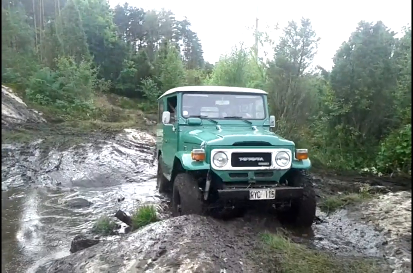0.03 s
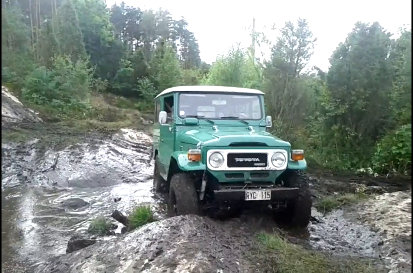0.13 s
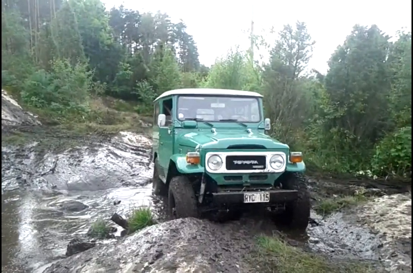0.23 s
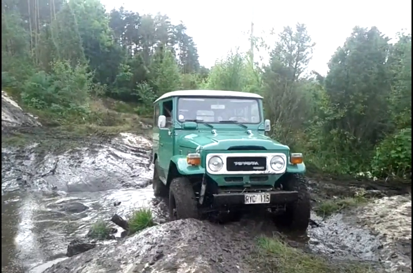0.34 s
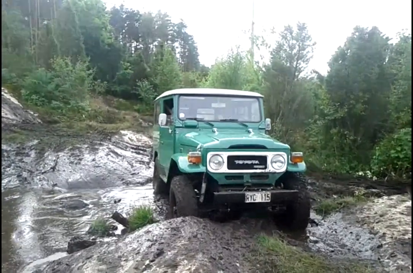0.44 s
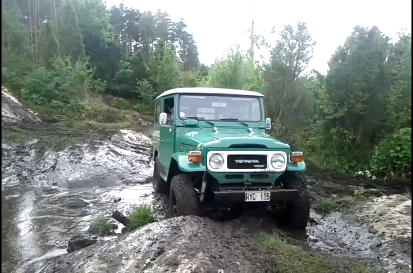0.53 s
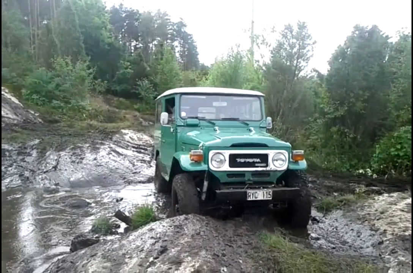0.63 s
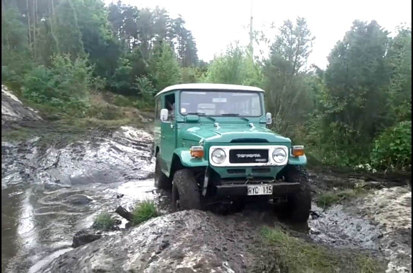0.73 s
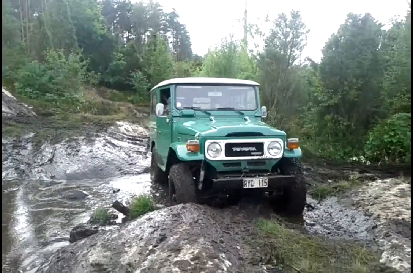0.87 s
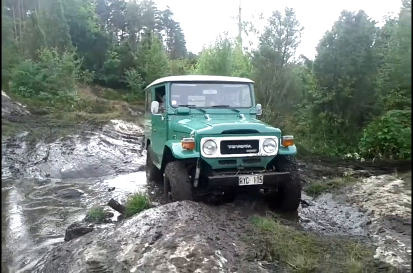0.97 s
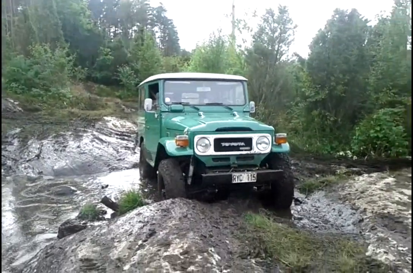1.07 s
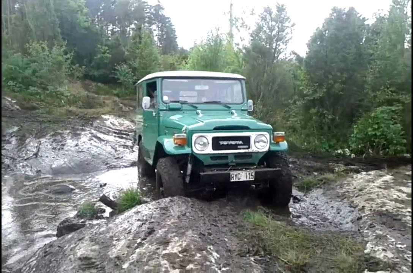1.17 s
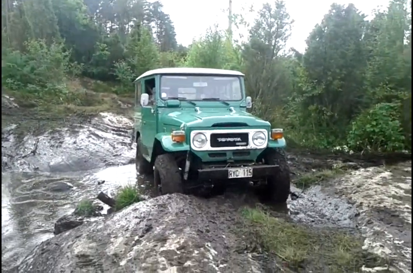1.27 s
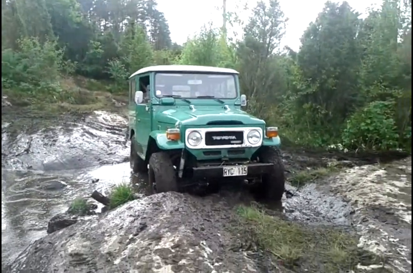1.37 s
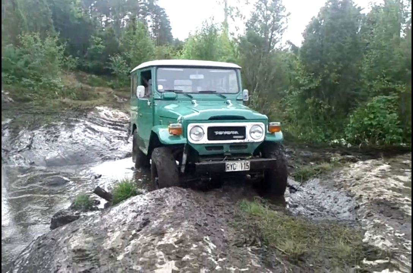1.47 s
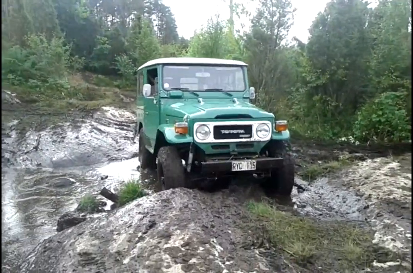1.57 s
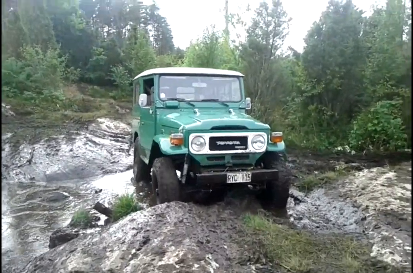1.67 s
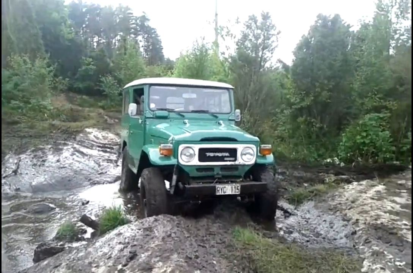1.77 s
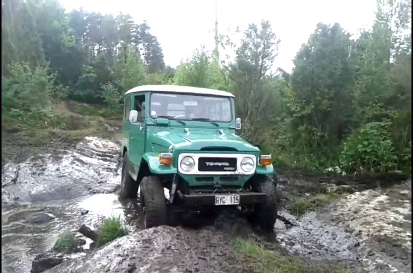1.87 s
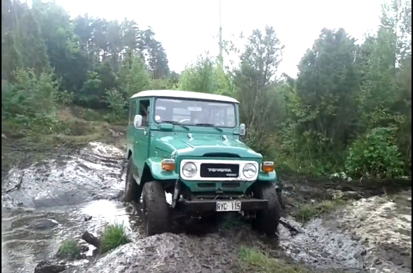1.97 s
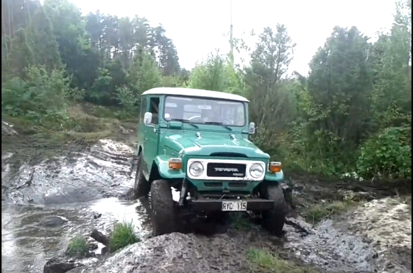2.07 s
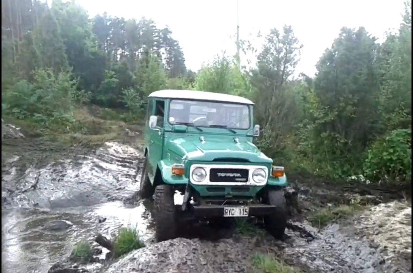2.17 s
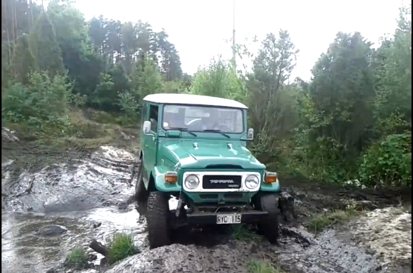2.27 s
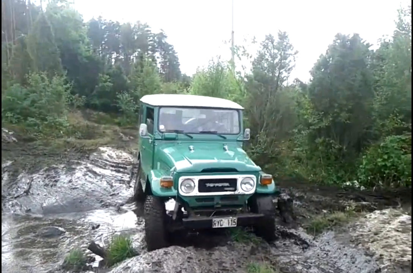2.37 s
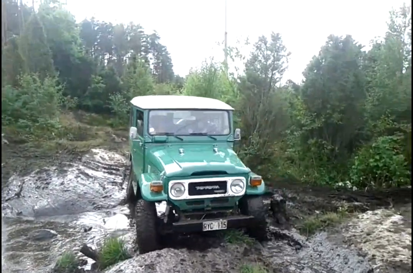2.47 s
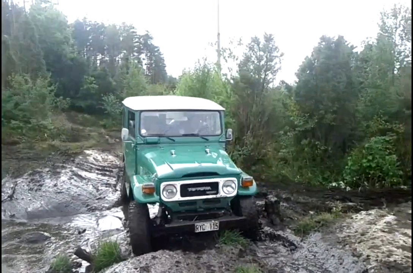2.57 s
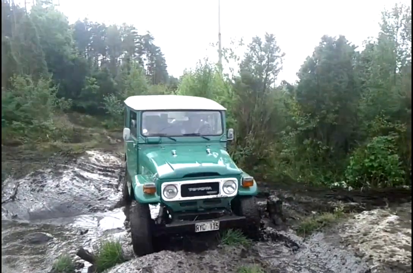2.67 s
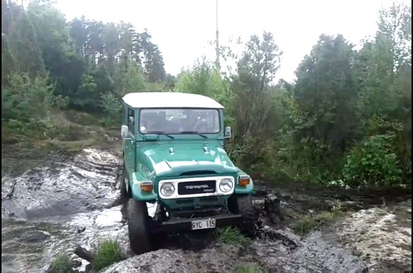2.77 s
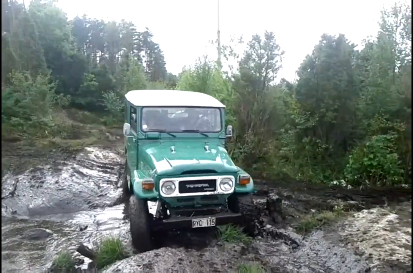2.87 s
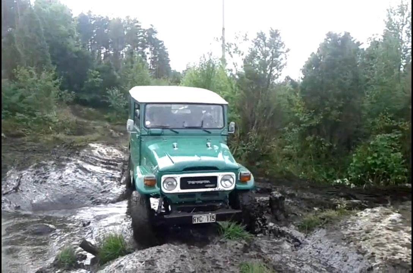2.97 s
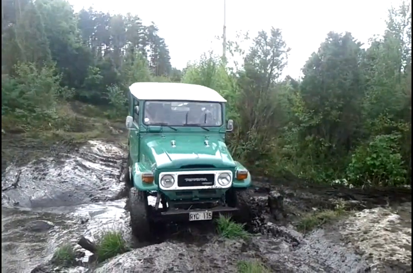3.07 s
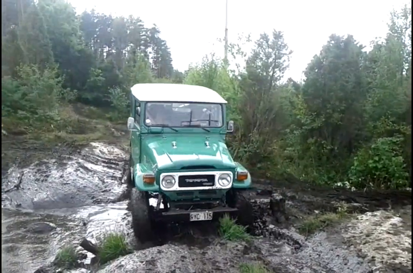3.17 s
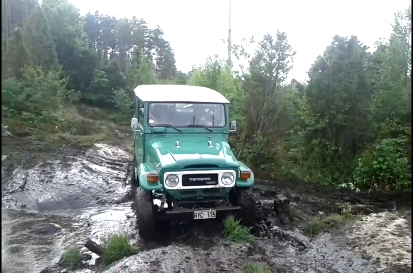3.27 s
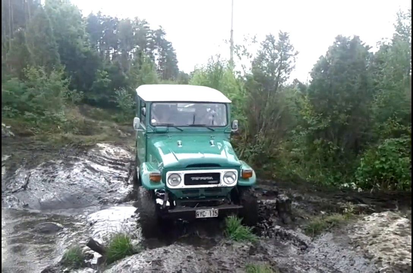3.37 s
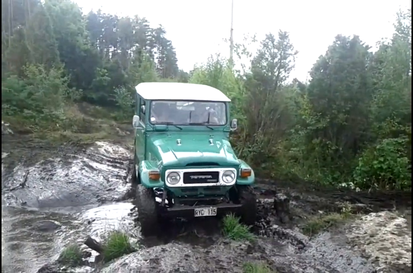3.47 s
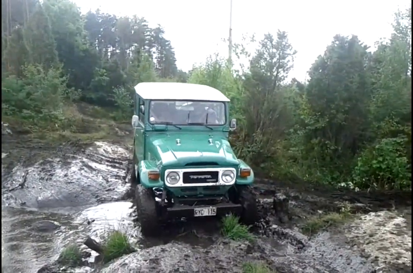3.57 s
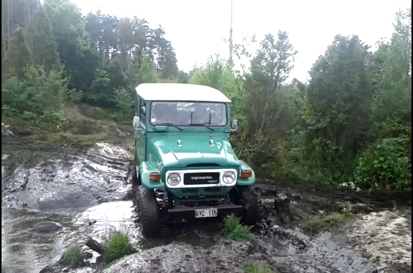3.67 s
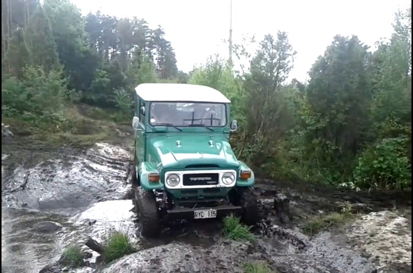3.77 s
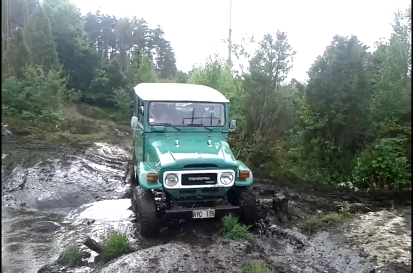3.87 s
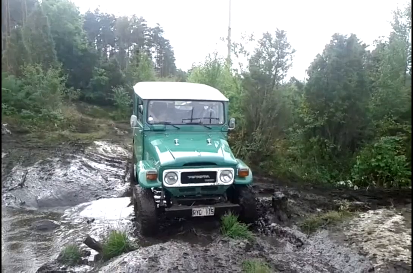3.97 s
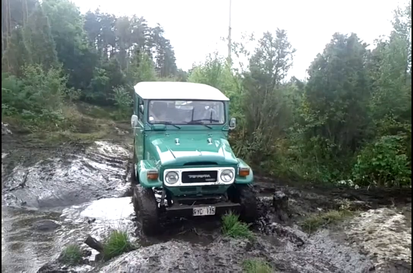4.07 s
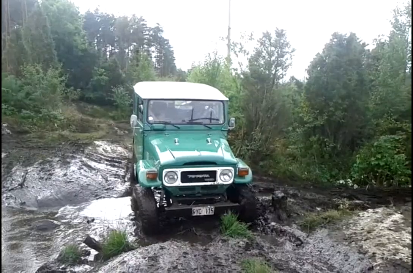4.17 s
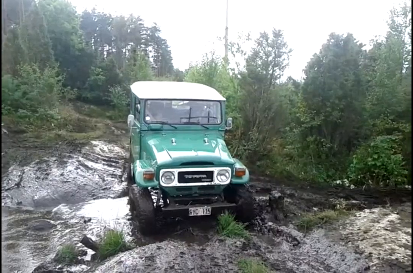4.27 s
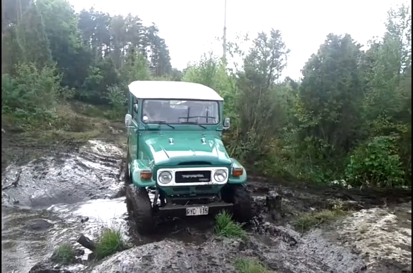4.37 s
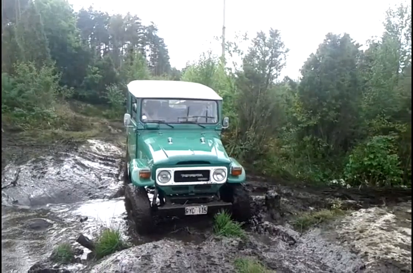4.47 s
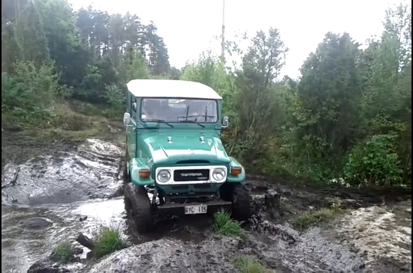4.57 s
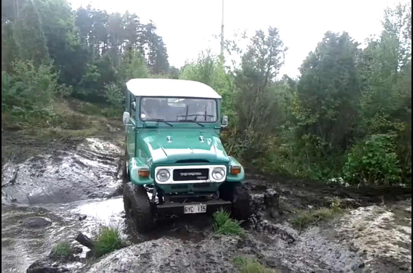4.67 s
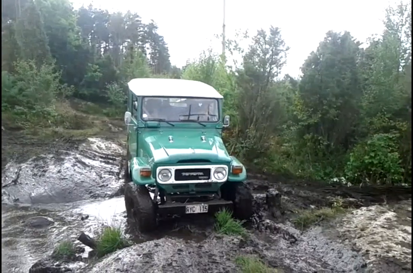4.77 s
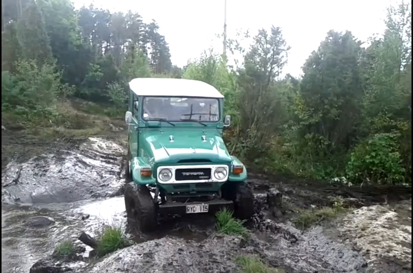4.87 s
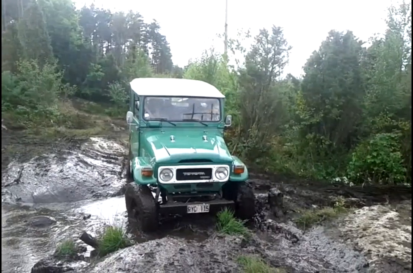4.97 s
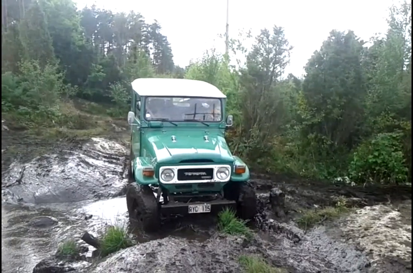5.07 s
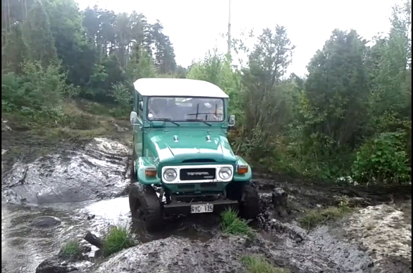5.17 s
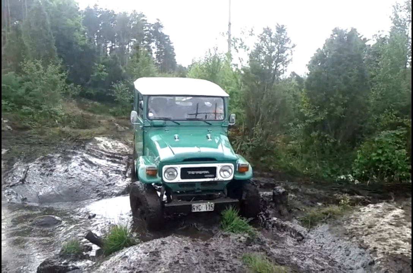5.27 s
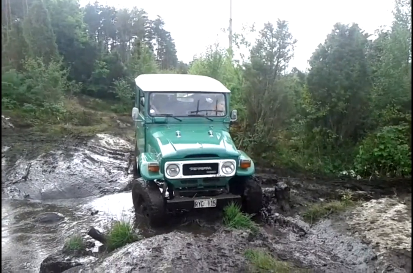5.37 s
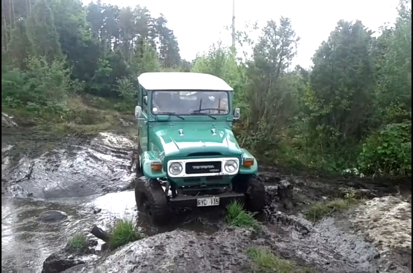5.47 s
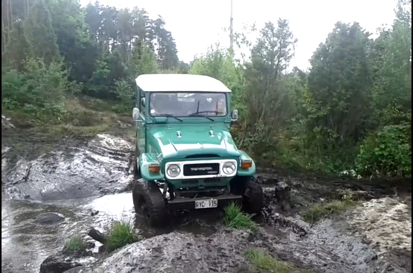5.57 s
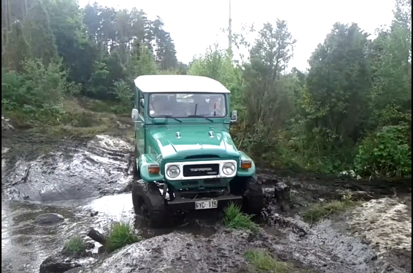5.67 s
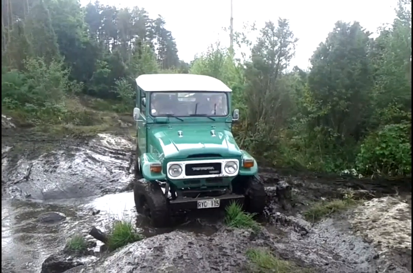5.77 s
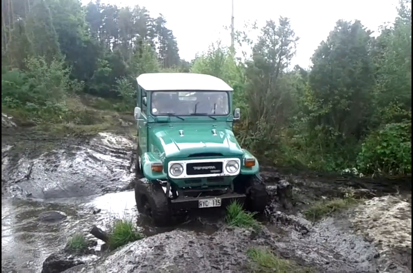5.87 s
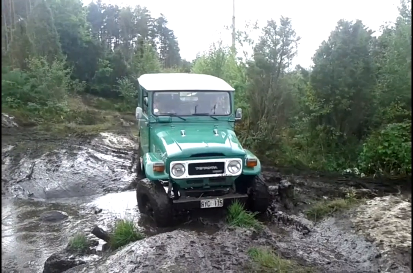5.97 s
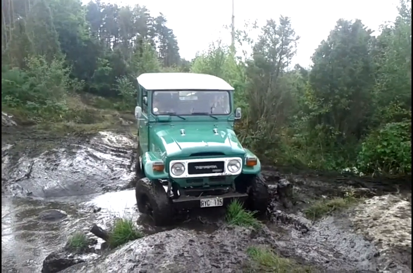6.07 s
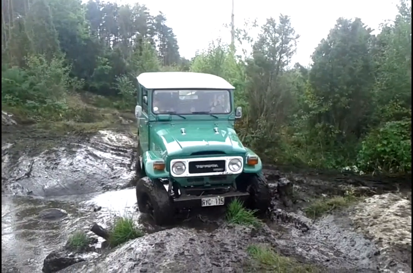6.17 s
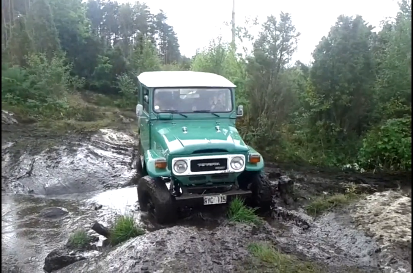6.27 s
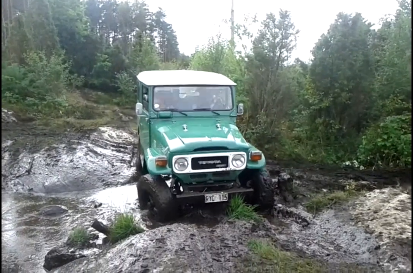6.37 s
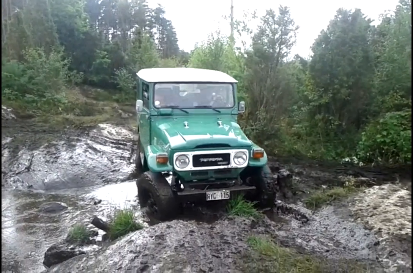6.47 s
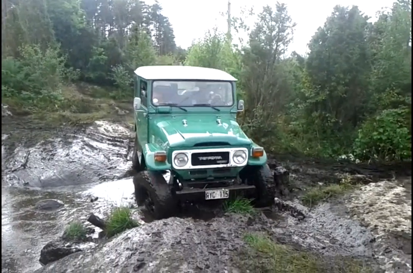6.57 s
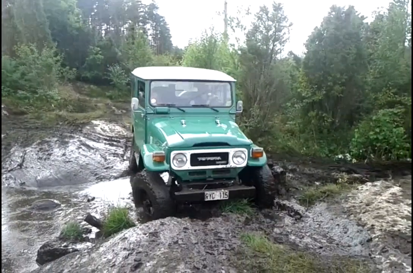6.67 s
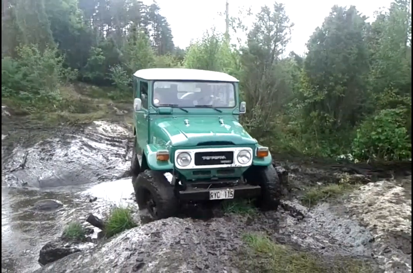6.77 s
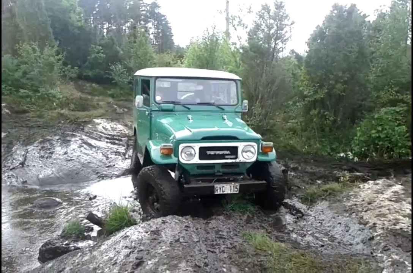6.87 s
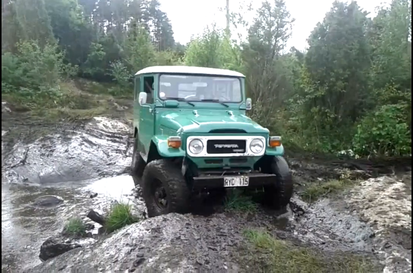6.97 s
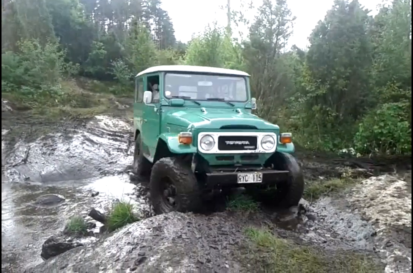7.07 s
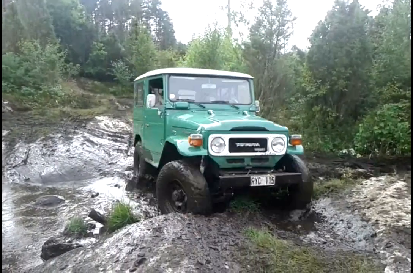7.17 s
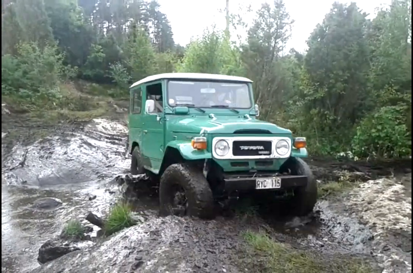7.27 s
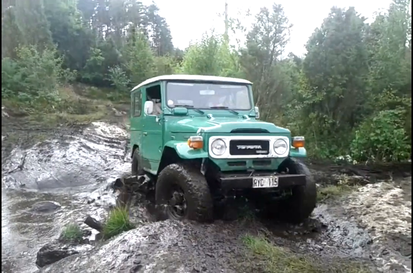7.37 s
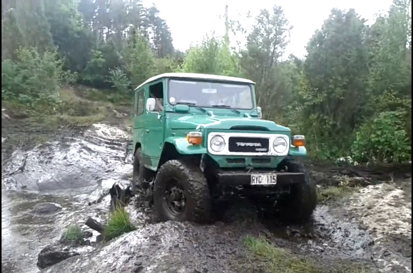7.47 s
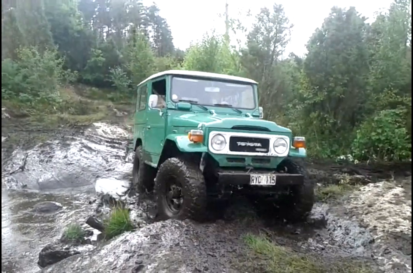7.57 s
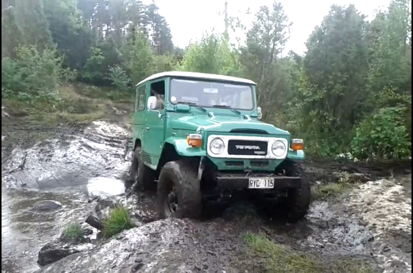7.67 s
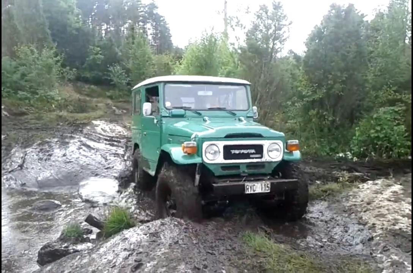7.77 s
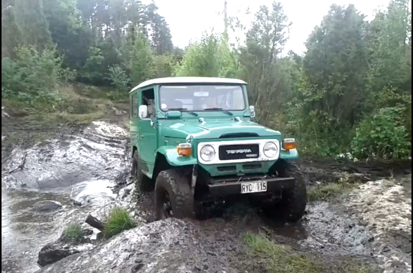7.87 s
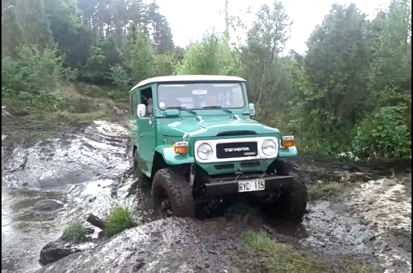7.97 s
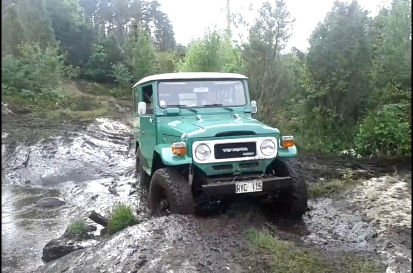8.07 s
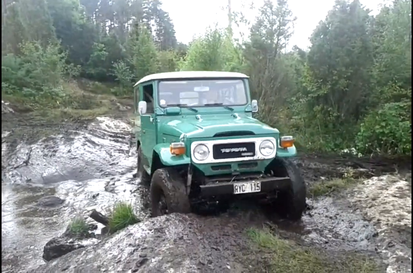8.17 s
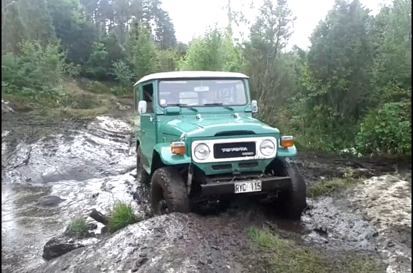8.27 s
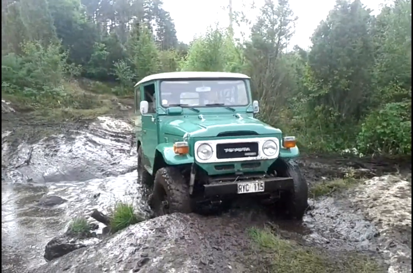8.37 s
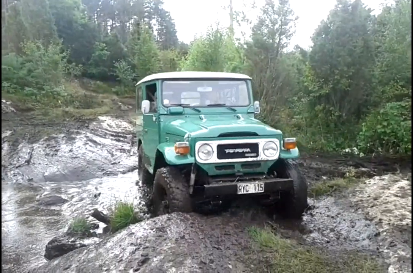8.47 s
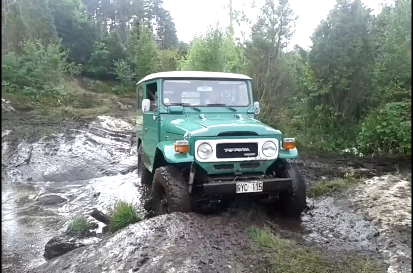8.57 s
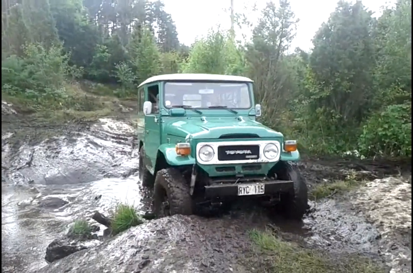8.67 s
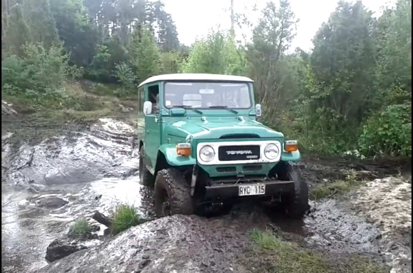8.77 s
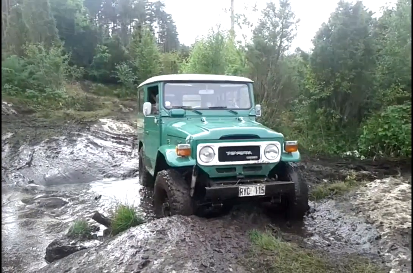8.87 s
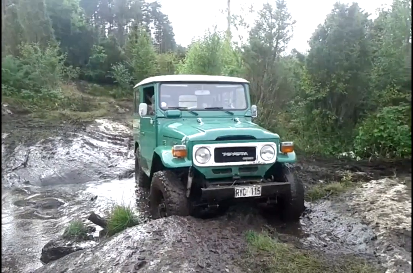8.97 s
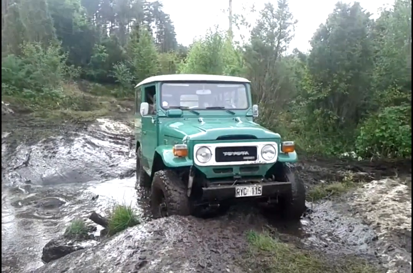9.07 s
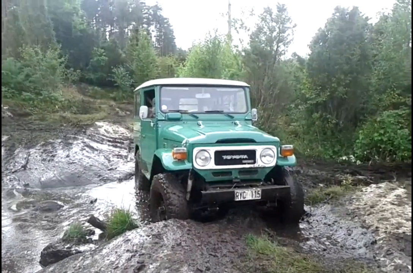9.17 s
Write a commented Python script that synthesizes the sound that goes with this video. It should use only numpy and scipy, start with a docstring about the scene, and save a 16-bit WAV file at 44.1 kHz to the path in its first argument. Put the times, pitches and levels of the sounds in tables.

```python
"""A four-cylinder diesel clatters down from high revs as its tyres churn wet mud.
The off-roader crawls on, knocking slowly at idle and roaring when revved. Firings pulse the intake
and body and ring a loose panel; fan and exhaust hum, puddles bubble, the chassis booms and squeaks,
and the gears whine at each pull. A second engine idles steadily.
The sound is nearly mono, with a notch in the treble."""
import sys
import numpy as np
from scipy import signal
from scipy.fft import rfft, irfft
from scipy.io import wavfile
from scipy.ndimage import uniform_filter1d

SR = 44100
rng = np.random.default_rng(int(sys.argv[2]) if len(sys.argv) > 2 else 0)


def to_wav(sig):
    """Store sig (one row per channel, or 1-D mono) as 16-bit WAV at the path in sys.argv[1].

    Samples outside -1..1 are clipped; the rate is SR.
    """
    pcm = np.clip(np.atleast_2d(sig), -1, 1) * 32767
    pcm = np.round(pcm).astype(np.int16)
    wavfile.write(sys.argv[1], SR, pcm.T)  # frames by channels


N = 406602
TIME = np.arange(N) / SR

# engine speed: (time [s], firing rate [Hz])
FIRING_HZ = [(0.0, 52.41), (0.44, 40.56), (0.8, 22.17), (1.29, 36.46), (1.87, 39.77), (2.3, 27.01),
             (2.76, 36.66), (3.04, 23.46), (3.95, 22.44), (4.07, 25.08), (4.28, 23.02), (5.1, 23.35),
             (5.55, 19.32), (5.94, 35.12), (6.4, 22.08), (6.87, 41.11), (7.2, 46.06), (7.51, 69.27),
             (7.65, 69.44), (7.82, 50.25), (8.16, 59.26), (8.54, 46.76), (9.22, 33.35)]
# engine load: (time [s], load [0 coasting, 1 full])
LOAD = [(0, 0.3), (.42, 0.01), (.8, 0.72), (1.25, 0.41), (1.7, 0.5), (2.05, 0.3), (2.4, 0.55), (3.1, 0.57),
        (4.9, 0.33), (5.62, 0.65), (6.02, 0.07), (6.4, .72), (6.7, 0.42), (7.25, 0.58), (7.65, 0.96),
        (8.18, 0.64), (8.45, 0.26), (9.22, 0.07)]
# combustion ping: (frequency [Hz], relative density [dB])
PING_SPECTRUM = [(500, -18), (900, -11), (1300, -8.5), (2000, -6.5), (2500, -1.5), (3100, -1.5),
                 (3900, -23.5), (5500, -18.5), (12000, -25.5)]
# cover resonances: (centre [Hz], width [Hz], lift [dB])
PING_MODES = [(1188, 41, 8), (1410, 240, 5.6), (2300, 160, 5.3), (2510, 140, 2.4), (3050, 76, 2.3)]
# spatter, spray and hiss: (frequency [Hz], relative density [dB])
MUD_SPECTRUM = [(1500, -38.5), (3500, -6), (4400, -1), (5300, 2), (6000, 0), (6800, -6.5), (9200, -10.5),
                (10400, -6.5), (11300, -12.5), (12000, -19.5), (14000, -20)]
HISS_LAW_DB = (-34.5, 8.37, 7.05)  # arguments of engine_gain


def gain_of(db):
    """Decibels to amplitude."""
    return 10 ** (np.asarray(db) / 20)


def unit_rms(x):
    """Scale to an rms of one."""
    return x / np.sqrt(np.mean(x ** 2) + 1e-20)


def curve(rows):
    """A (time, value) table at every sample."""
    return np.interp(TIME, *np.transpose(rows))


def arch(middle_s, length_s):
    """Half sine, 0 to 1 to 0."""
    return np.cos(np.pi * np.clip((TIME - middle_s) / length_s, -.5, .5))


def add(mix, start_s, sound):
    """Mix a sound in at start_s."""
    part = mix[max(round(start_s * SR), 0):][:len(sound)]
    part += sound[:len(part)]


def wander(hz):
    """Unit-rms random drift, rolled off above hz."""
    lowpass = np.exp(-(np.fft.rfftfreq(N, 1 / SR) / hz) ** 2)
    return unit_rms(irfft(rfft(rng.standard_normal(N)) * lowpass, N))


def colour(x, spectrum, modes=(), size=8192):
    """Minimum-phase filter: broad spectrum plus ringing modes; unit-rms output."""
    hz = np.fft.rfftfreq(size, 1 / SR)
    knots_hz, db = np.transpose(spectrum)
    knots_hz = np.r_[knots_hz[0] / 2, knots_hz, knots_hz[-1] * 2]
    db = np.interp(np.log(hz + 1), np.log(knots_hz), np.r_[-70, db, -70])
    for centre_hz, width_hz, lift_db in modes:
        db = db + lift_db / (1 + (2 * (hz - centre_hz) / width_hz) ** 2)
    log_gain = np.log(gain_of(np.r_[db, db[-2:0:-1]]))
    taps = np.fft.ifft(np.exp(np.conj(signal.hilbert(log_gain)))).real[:size // 2]
    return unit_rms(signal.oaconvolve(x, taps)[:len(x)])


def blows(cycles, powers, spread_db, jitter_s, decay_s):
    """Power envelope of one uneven blow a cycle, building through the metal and dying away."""
    at = np.flatnonzero(np.diff(np.floor(cycles)) > 0)
    late, strong = rng.standard_normal((2000, 2))[:len(at)].T
    onsets = np.clip(at + (late * jitter_s * SR).astype(int), 0, N - 1)
    train = np.zeros(N)
    train[onsets] = powers[at] * gain_of(spread_db * strong) ** 2
    age = TIME[:SR // 20] / decay_s
    return np.abs(signal.oaconvolve(train, age * np.exp(1 - age))[:N])


def grains(per_s, spread_db):
    """Random clicks, a few of them large."""
    sizes = gain_of(spread_db * np.minimum(rng.exponential(1, N), 5))
    return unit_rms(rng.standard_normal(N) * sizes * (rng.random(N) < per_s / SR))


def harmonics(cycles, table, waver):
    """Harmonics of a rotation, each fluttering in strength."""
    out = np.zeros(N)
    for order, db in table:
        amplitude = gain_of(db) * np.sqrt(2) * (1 + waver * wander(3.6))
        out += amplitude * np.sin(2 * np.pi * (order * cycles + rng.random()))
    return out


def engine_gain(idle_db, per_doubling_db, full_load_db):
    """Engine noise grows with speed and load from an unloaded 23 Hz idle."""
    doublings = np.log2(curve(FIRING_HZ) / 23)
    return gain_of(idle_db + per_doubling_db * doublings + full_load_db * curve(LOAD))


def engine(firings):
    """Knocks ping over valve and gear rattle; intake and body throb along. Returns sound and pulse."""
    # knock per cylinder: (level [dB])
    cylinders_db = [-0.18, -0.98, 0.6, 0.97]
    # block, intake and body spectra: (frequency [Hz], relative density [dB])
    block_spectrum = [(500, -24), (800, -8), (1000, -5.5), (1200, -1.5), (1500, -0.5), (1650, -3.5),
                      (1800, -1.5), (2100, -2), (2700, -5), (3300, -4), (3900, -8), (5500, -27.5),
                      (10000, -22), (14000, -24)]
    intake_spectrum = [(250, -42), (410, -13), (490, -4.5), (540, -5.5), (610, 0.5), (680, -1), (780, -1.5),
                       (900, -19), (1300, -33.5)]
    body_spectrum = [(22, -41.5), (45, -9.5), (70, -2), (95, -5.5), (125, 1.5), (150, -1), (210, 1),
                     (255, -2.5), (300, 1), (340, -6), (430, -8), (700, -11)]
    # block and intake resonances: (centre [Hz], width [Hz], lift [dB])
    block_modes = [(1175, 120, 2.5), (1420, 180, -1), (1762, 96, 2.5), (2390, 200, 4), (2770, 69, 7),
                   (3030, 130, 1), (3560, 19, 7.5)]
    intake_modes = [(649.5, 8.1, 8.3)]
    soften_hz = 45  # the knock hardens with load, softens above this firing rate
    hardness = (0.63 + 0.86 * curve(LOAD)) / (1 + (curve(FIRING_HZ) / soften_hz) ** 5)
    cylinder = gain_of(cylinders_db)[np.round(firings).astype(int) % len(cylinders_db)] ** 2
    knock = 1.24 * blows(firings + 0.15, cylinder * hardness, spread_db=1.3, jitter_s=.0004, decay_s=.0037)
    valves = blows(3 * firings, np.ones(N), spread_db=2.4, jitter_s=.002, decay_s=.001)
    ping = knock + 0.16 * hardness * (1 + 3 * valves)  # covers buzz between knocks
    rattle = 1 + .5 * valves + 0.33 * knock
    mean_power = uniform_filter1d(ping + rattle, SR // 8)
    pulse = np.sqrt((ping + rattle) / mean_power)
    clatter = np.zeros(N)
    for power, spectrum, modes in ((ping, PING_SPECTRUM, PING_MODES),
                                   (rattle, block_spectrum, block_modes)):
        share = power / mean_power
        impacts = np.sqrt(share) * grains(per_s=25000, spread_db=0.78)
        clatter += np.sqrt(share.mean()) * colour(impacts, spectrum, modes)
    growl = colour(pulse ** .5 * rng.standard_normal(N), intake_spectrum, intake_modes)
    rumble = colour(pulse ** .5 * rng.standard_normal(N), body_spectrum)
    clatter *= engine_gain(idle_db=-28.5, per_doubling_db=7.3, full_load_db=6)
    growl *= engine_gain(idle_db=-40.5, per_doubling_db=10, full_load_db=7.5)
    rumble *= engine_gain(idle_db=-39.5, per_doubling_db=5.94, full_load_db=4.7)
    return clatter + growl + rumble, pulse


def panel(firings):
    """A loose steel panel rings, struck at each firing."""
    # ringing: (time [s], level [dB])
    ring_db = [(0, -25), (.8, -28.5), (1.19, -23.5), (1.6, -30.5), (2.1, -46), (4.5, -37), (5.7, -32),
               (9.22, -34)]
    # panel response: (frequency [Hz], relative density [dB])
    ring_spectrum = [(1500, -40), (2080, -17), (2250, 1.5), (2390, -3.5), (2520, -15.5), (3200, -24)]
    power = blows(firings + 0.11, np.ones(N), spread_db=3.0, jitter_s=0.00079, decay_s=0.0032)
    ring_hz = 2320 + 55 * wander(69.2)
    ring = unit_rms(np.sqrt(power) * np.sin(2 * np.pi * np.cumsum(ring_hz) / SR))
    buzz = colour(np.sqrt(power + 0.21) * rng.standard_normal(N), ring_spectrum)
    return gain_of(curve(ring_db)) * unit_rms(buzz + 0.42 * ring)


def fan(firings):
    """The cooling fan hums in surges, four blade passes a firing."""
    # surges: (middle [s], length [s], level [dB])
    surges = [(.03, 0.71, -33.5), (7.08, 0.43, -40.5), (7.6, 0.53, -29), (8.195, 0.58, -32),
              (8.6, 1.0, -37.5)]
    # blade tones: (order [x firing rate], level [dB])
    blade_orders = [(4, 2.5), (8, -9), (12, -3), (16, -14), (20, -3)]
    swell = sum(gain_of(db) * arch(middle_s, length_s) for middle_s, length_s, db in surges)
    return swell * harmonics(firings, blade_orders, waver=0.52)


def exhaust(firings):
    """The exhaust note comes up with revs and load."""
    # note at full revs and load: (order [x firing rate], level [dB])
    pipe_orders = [(1, -42.5), (2, -43.5), (3, -41.5), (5, -36), (6, -40), (8, -40.5)]
    coasting_db, full_hz = -12.5, 53
    load_gain = gain_of(coasting_db * (1 - curve(LOAD)))
    speed_gain = np.minimum(curve(FIRING_HZ) / full_hz, 1) ** 3
    return load_gain * speed_gain * harmonics(firings, pipe_orders, waver=0.56)


def second_engine():
    """A steady idle whose fourth harmonic is a wavering drone."""
    # idle tones: (order [x firing rate], level [dB])
    idle_orders = [(2, -58), (3, -49.5), (6, -49.5), (8, -47.5), (10, -54), (13, -61)]
    firing_hz, drone_db, waver_db = 23.09, -38, 4.5
    firings = firing_hz * TIME + 0.04 * wander(3.1)
    swell = np.minimum(wander(8.4), 1)
    drone = gain_of(drone_db + waver_db * swell) * np.sin(2 * np.pi * 4 * firings)
    return drone + harmonics(firings, idle_orders, waver=.2)


def mud_and_hiss(pulse):
    """Fine mud spatter blends with engine hiss that throbs at each firing."""
    spatter = grains(per_s=4500, spread_db=2.2) * gain_of(2.7 * wander(25))
    hiss = pulse ** 1.24 * rng.standard_normal(N)
    return colour(0.5 * spatter + hiss, MUD_SPECTRUM) * engine_gain(*HISS_LAW_DB)


def side_hiss():
    """Treble hiss that differs between the two microphone ports."""
    # side signal: (frequency [Hz], relative density [dB])
    side_spectrum = [(6500, -32.5), (9200, -4), (10800, 3), (12500, -1.5), (14000, -12)]
    return gain_of(-28.5) * engine_gain(*HISS_LAW_DB) * colour(rng.standard_normal(N), side_spectrum)


def slosh():
    """Tyres squeeze puddles out of the ruts in clumps of small bubbles and throw up spray."""
    # puddles: (middle [s], length [s], bubbles [dB], spray [dB])
    puddles = [(0.032, 0.95, -28.5, -33), (1.25, 1, -38, -29), (1.767, 1, -28, -26.5), (2.647, 1, -33, -35),
               (7.115, 0.64, -30, -22), (7.627, 0.26, -20, -27), (8.118, 0.48, -19, -32)]
    # bubbles: (frequency [Hz], relative density [dB])
    bubble_spectrum = [(700, -23), (980, -6), (1160, -1.5), (1350, -3), (1620, -9.5), (1820, -10),
                       (2300, -17)]
    ruts_db = -42.5  # bubbling between puddles
    bubble_gain, spray_gain = np.zeros((2, N))
    for middle_s, length_s, bubbles_db, spray_db in puddles:
        depth = arch(middle_s, length_s) ** 2
        bubble_gain += gain_of(bubbles_db) * depth
        spray_gain += gain_of(spray_db) * depth
    pops = grains(per_s=1500, spread_db=2.8) * gain_of(3.4 * wander(14))
    drops = grains(per_s=5500, spread_db=2.4) * gain_of(3.7 * wander(30))
    bubbles = np.hypot(bubble_gain, gain_of(ruts_db)) * colour(pops, bubble_spectrum)
    return bubbles + spray_gain * colour(drops, MUD_SPECTRUM)


def hard_knocks():
    """Now and then a cylinder fires harder and rings the covers."""
    # hard firings: (time [s], level [dB])
    knocks = [(1.158, -25), (1.184, -27), (1.217, -31), (3.251, -29), (3.725, -30), (3.77, -30),
              (3.815, -27.5), (5.665, -28), (5.706, -26.5), (6.346, -29), (6.79, -23)]
    rise_s, decay_s = 0.00075, 0.0053
    out, t = np.zeros(N), TIME[:SR // 30]
    envelope = np.exp(-t / decay_s) * (1 - np.exp(-t / rise_s))
    for start_s, db in knocks:
        blow = rng.standard_normal(len(t)) * envelope
        add(out, start_s, gain_of(db) * colour(blow, PING_SPECTRUM, PING_MODES))
    return out


def chassis():
    """The steel body booms as the wheels drop and climb; stick-slip makes brief squeaks."""
    # booms and squeaks: (middle [s], pitch [Hz], level [dB], length [s])
    booms = [(1.25, 223, -31, 0.12), (1.76, 664, -20, 0.15), (2.45, 705, -21, .08), (2.72, 588, -27, .1),
             (2.96, 662, -32, 0.092), (7.38, 192, -15, 0.1), (7.385, 240, -14, .11),
             (7.39, 302, -16.5, 0.082), (7.52, 496, -17, 0.086), (7.535, 581, -13.5, 0.15),
             (7.59, 672, -13, 0.11)]
    squeaks = [(1.605, 5420, -14, 0.032), (1.834, 4820, -11.5, 0.027), (1.851, 5700, -14.5, 0.023),
               (1.87, 5060, -16, 0.053), (5.775, 6500, -28, 0.046), (7.166, 6030, -13.5, 0.016)]
    out = np.zeros(N)
    for events, octave_db, waver, rasp_hz in ((squeaks, -12, .013, 500), (booms, -22, .03, 110)):
        drift = 1 + waver * wander(rasp_hz)
        for middle_s, hz, db, length_s in events:
            count = int(length_s * SR)
            phase = 2 * np.pi * np.cumsum(hz * drift[int(middle_s * SR):][:count]) / SR
            tone = np.sin(phase) + gain_of(octave_db) * np.sin(2 * phase)
            add(out, middle_s - length_s / 2, gain_of(db) * np.hanning(count) * tone)
    return out


def gears():
    """Driveline whine rises and falls in pitch and strength with each pull of the wheels."""
    # pulls: (middle [s], length [s], top mesh rate [Hz], level [dB])
    pulls = [(1.831, 1.2, 167.5, -36), (2.8, .9, 170, -38), (6.848, .6, 167, -40), (7.55, 0.64, 166.3, -27),
             (8.166, .6, 167, -45)]
    # whine: (order [x mesh rate], level [dB])
    whine_orders = [(2, -7), (3, -6), (4, 1), (8, -9)]
    out = np.zeros(N)
    for middle_s, length_s, top_hz, db in pulls:
        pull = arch(middle_s, length_s)
        mesh_hz = top_hz * (1 - .11 * (1 - pull))
        mesh_cycles = np.cumsum(mesh_hz) / SR + 0.035 * wander(6)
        out += gain_of(db) * pull * harmonics(mesh_cycles, whine_orders, waver=0.4)
    return out


def scene():
    """All sources centred; only the top of the hiss has width."""
    firings = .47 + np.cumsum(curve(FIRING_HZ)) / SR
    motor, pulse = engine(firings)
    mix = motor + panel(firings) + hard_knocks()
    rough_firings = firings + .026 * wander(36)  # phase jitter roughens the tones
    mix += fan(rough_firings) + exhaust(rough_firings) + gears() + second_engine()
    mix += mud_and_hiss(pulse) + slosh() + chassis()
    side = side_hiss()
    return np.array([mix + side, mix - side])


def record(dry):
    """Soft peak limiter, treble notch and low-pass."""
    ceiling, notch_hz, cutoff_hz = .92, (6930, 9080), 14000
    limited = dry / (1 + (dry / ceiling) ** 8) ** (1 / 8)
    taps = signal.firwin(1023, [*notch_hz, cutoff_hz], window=("kaiser", 9), fs=SR)
    return signal.oaconvolve(limited, taps[None], "same")


dry = scene()
out = record(dry)
to_wav(out)
```